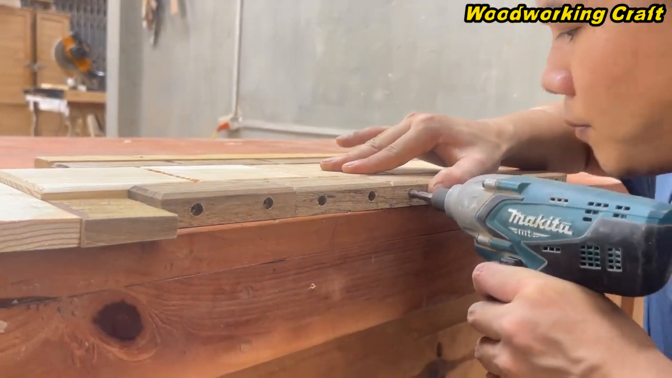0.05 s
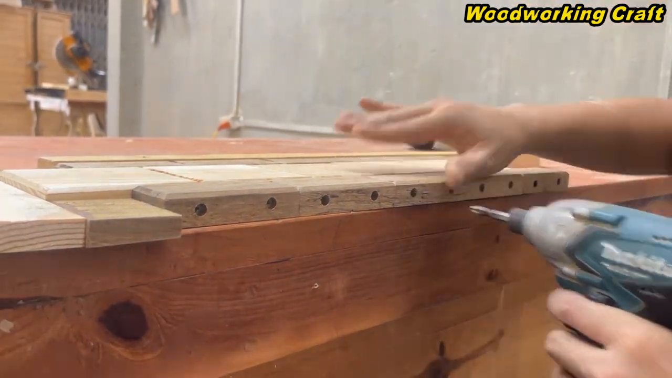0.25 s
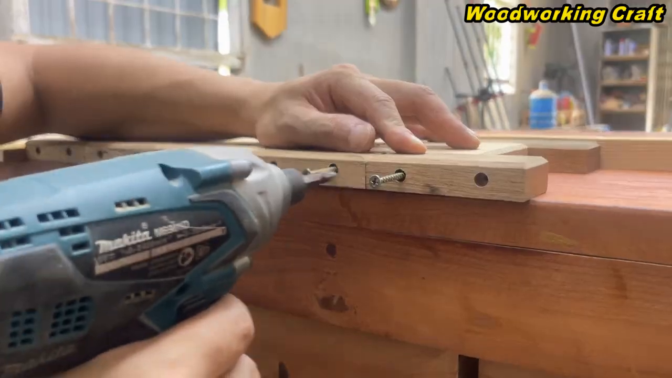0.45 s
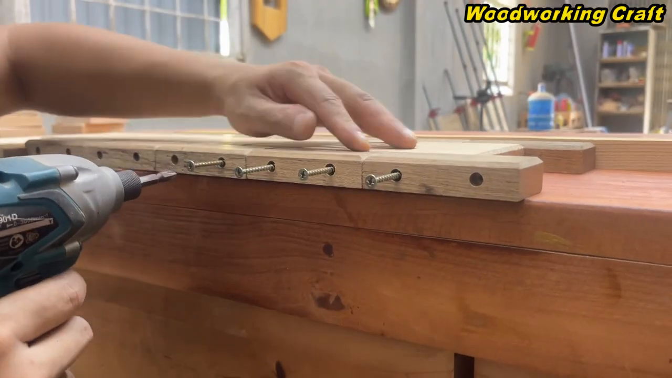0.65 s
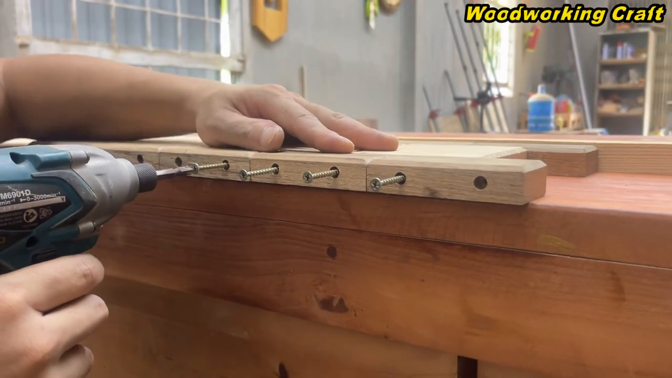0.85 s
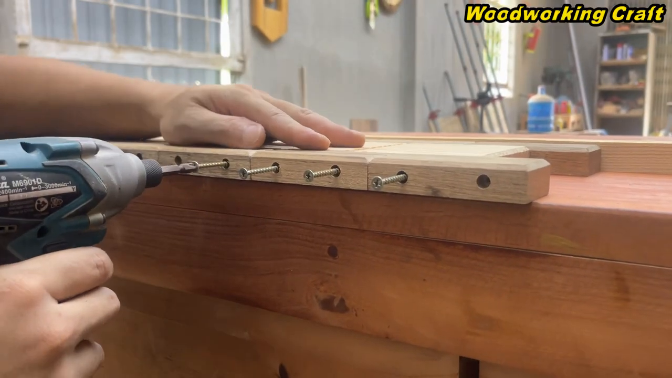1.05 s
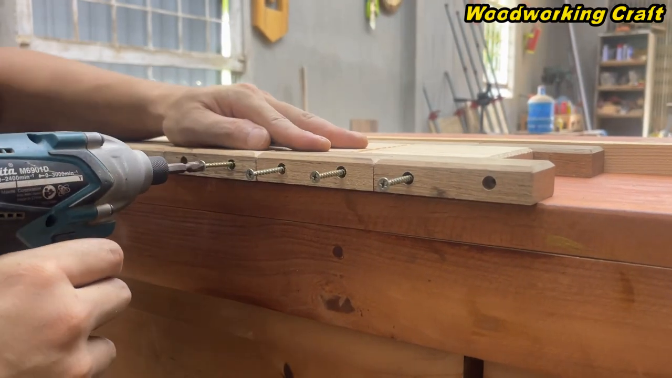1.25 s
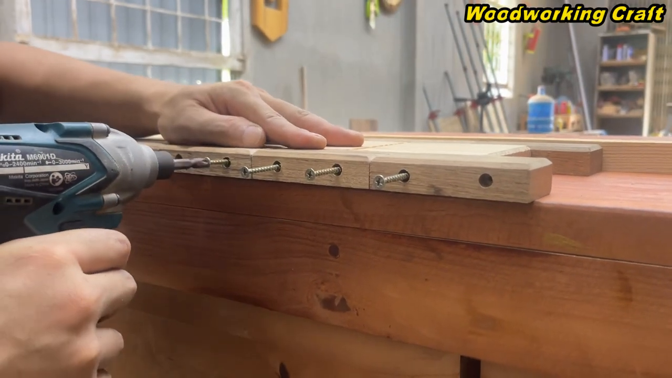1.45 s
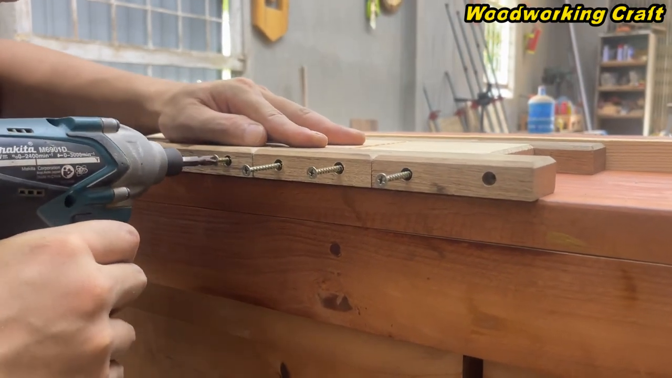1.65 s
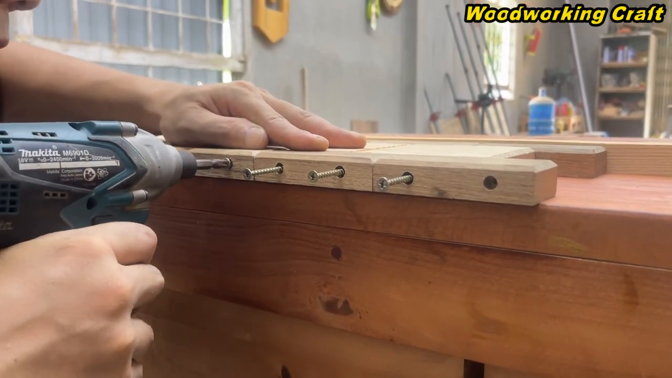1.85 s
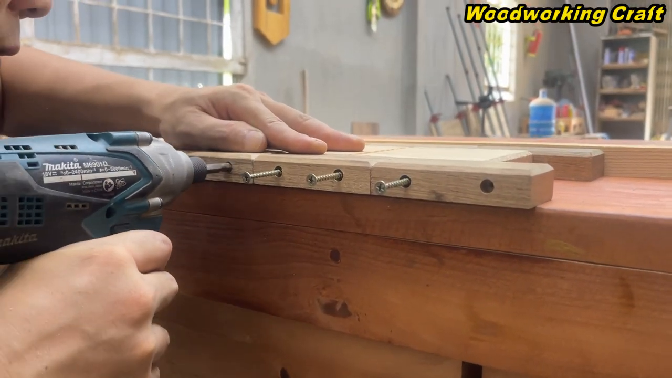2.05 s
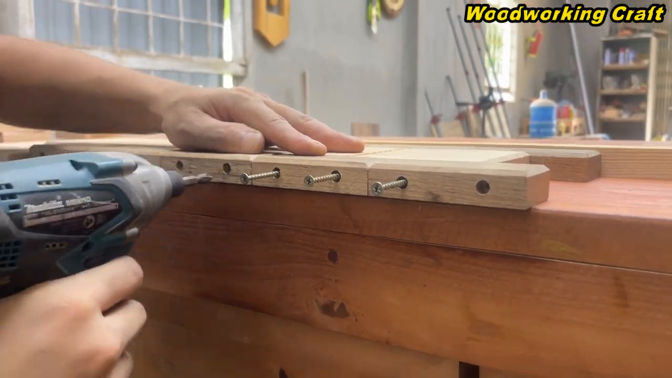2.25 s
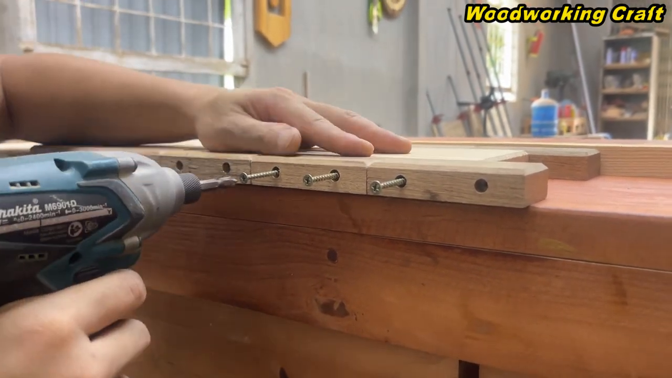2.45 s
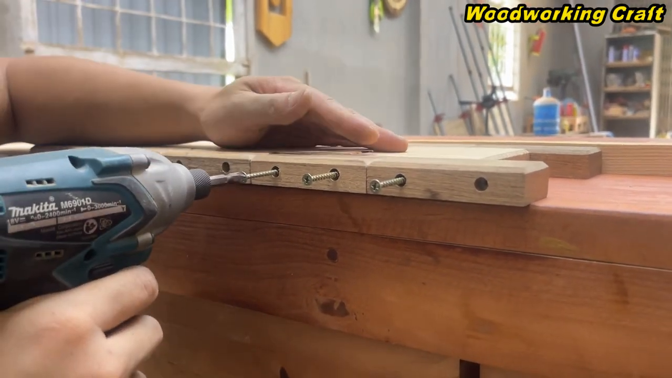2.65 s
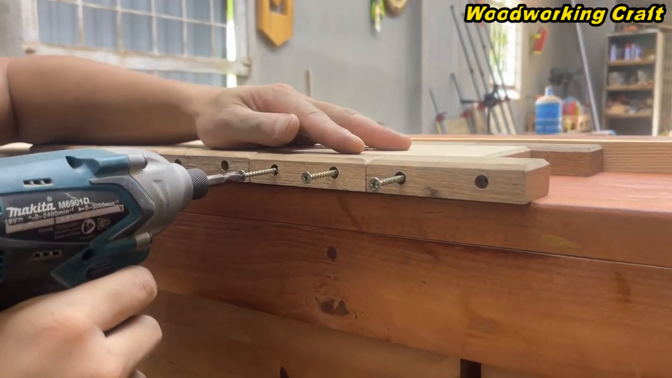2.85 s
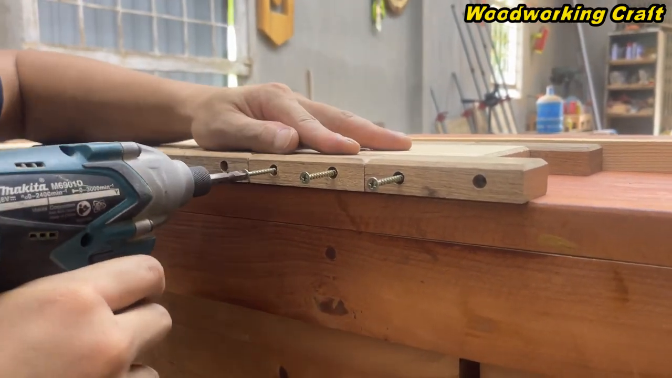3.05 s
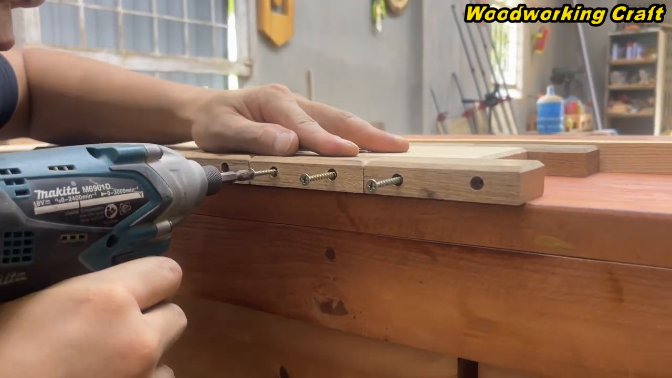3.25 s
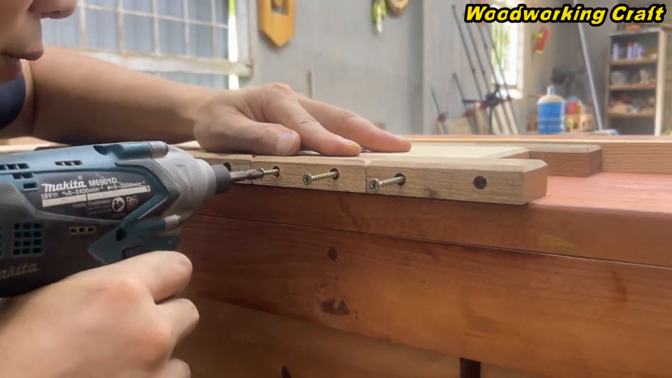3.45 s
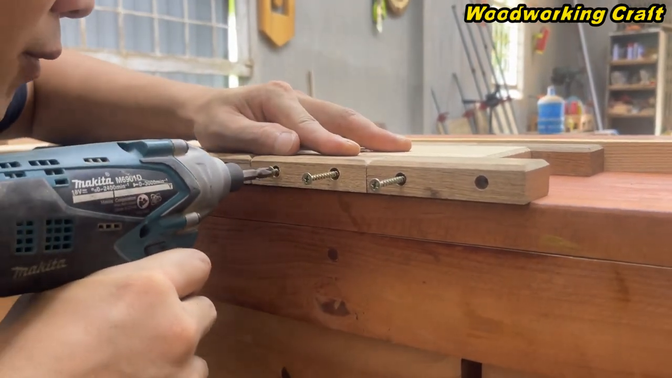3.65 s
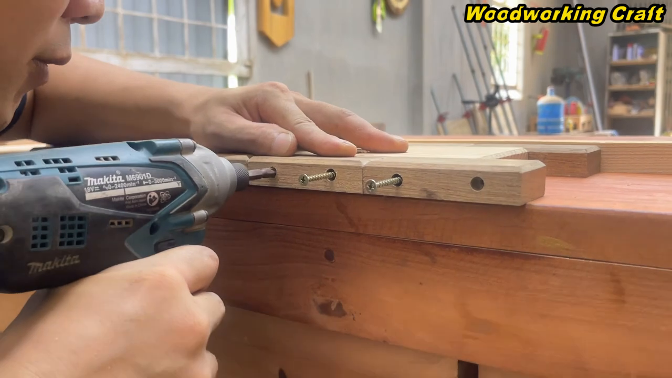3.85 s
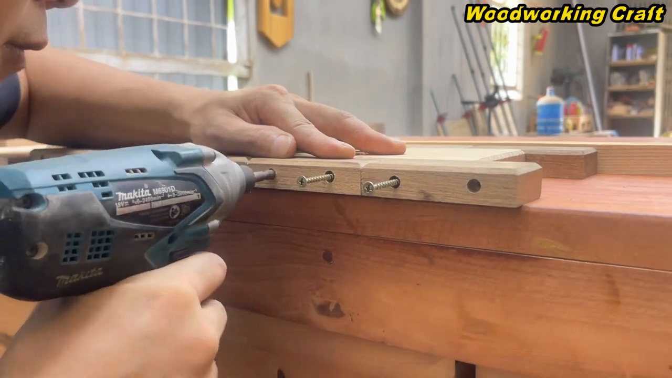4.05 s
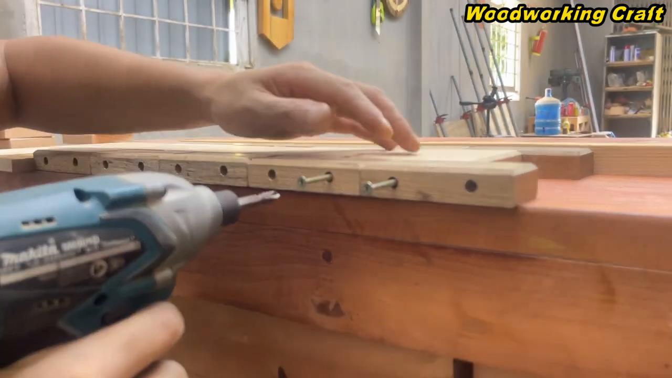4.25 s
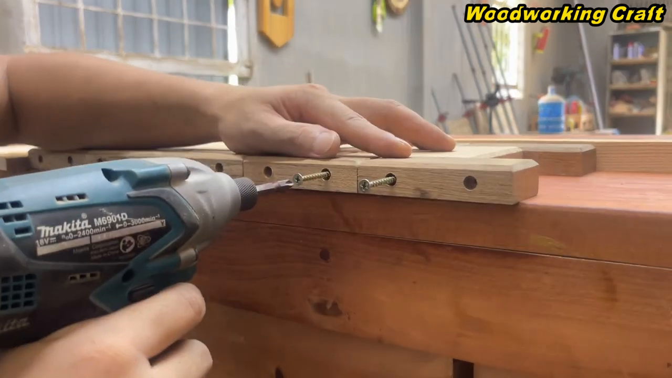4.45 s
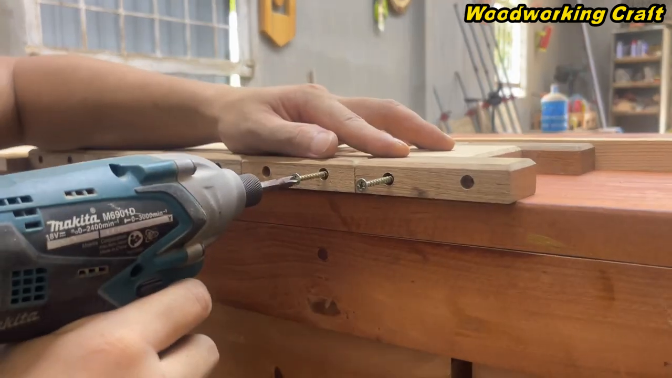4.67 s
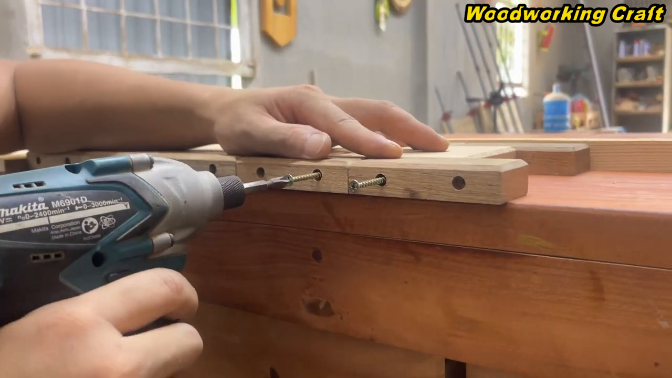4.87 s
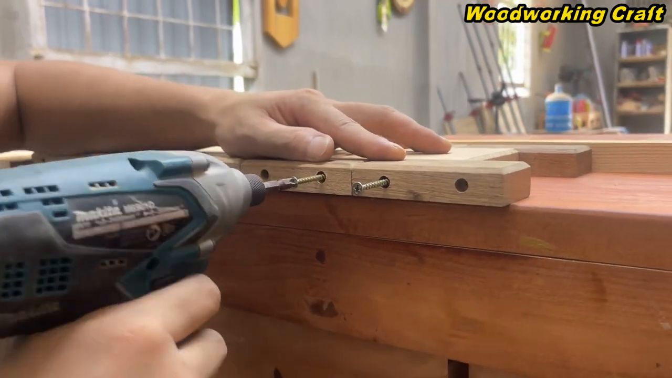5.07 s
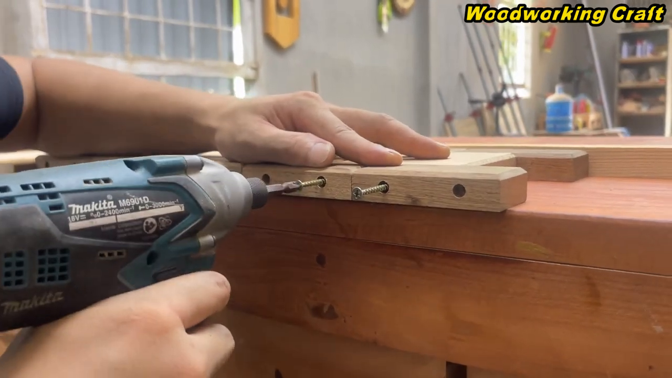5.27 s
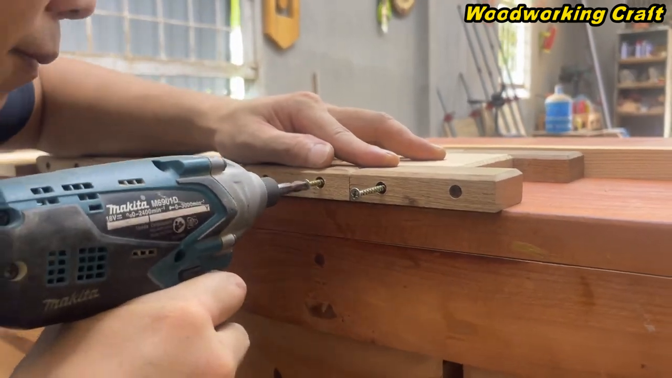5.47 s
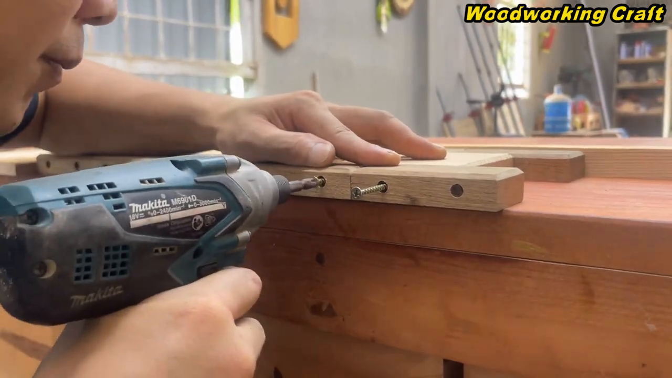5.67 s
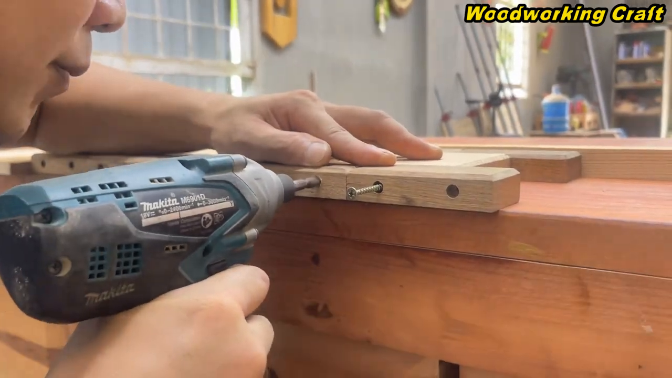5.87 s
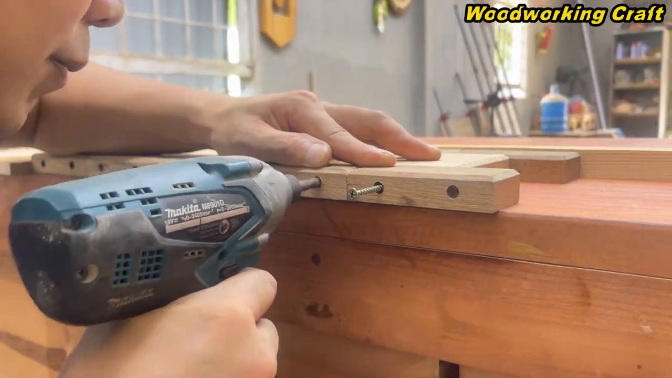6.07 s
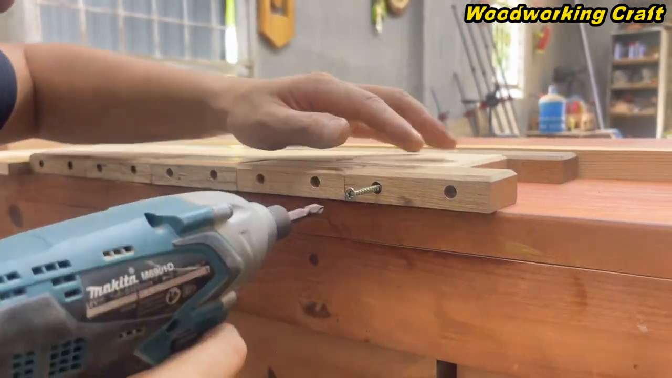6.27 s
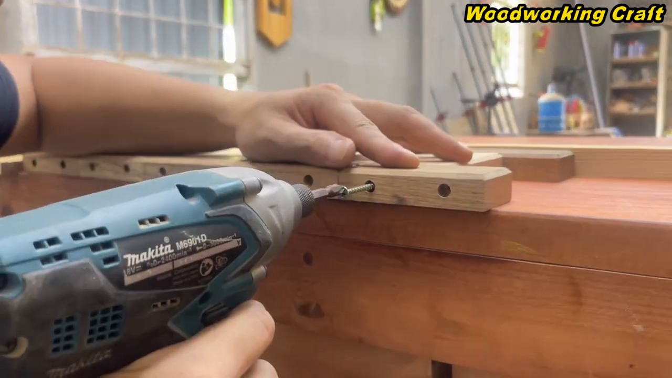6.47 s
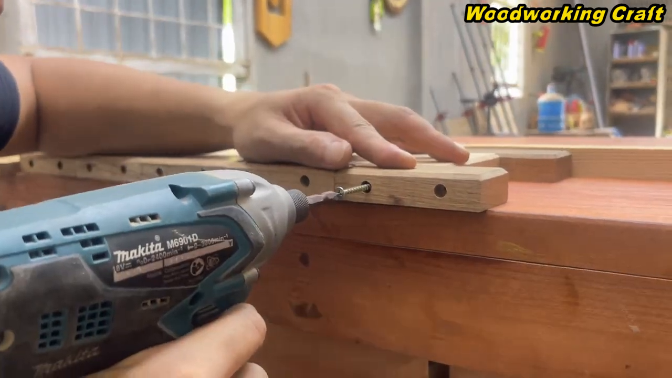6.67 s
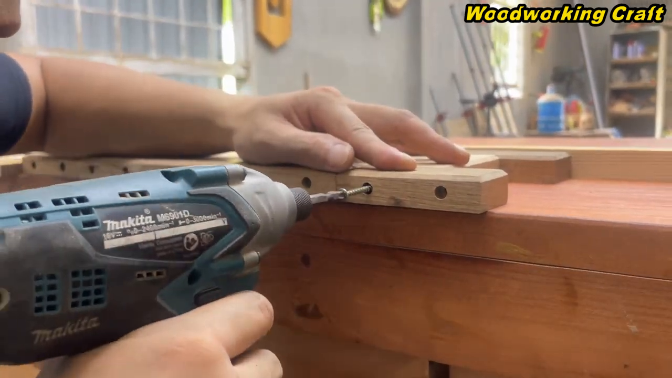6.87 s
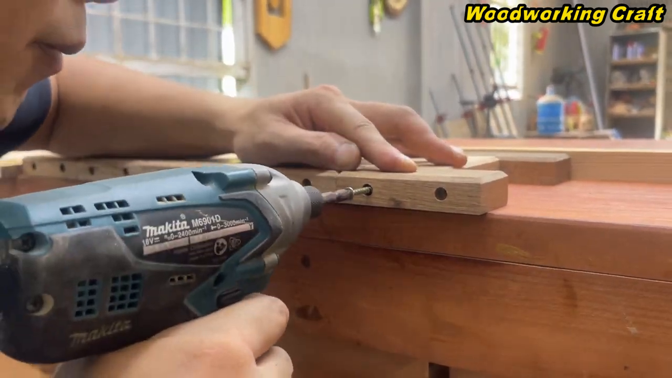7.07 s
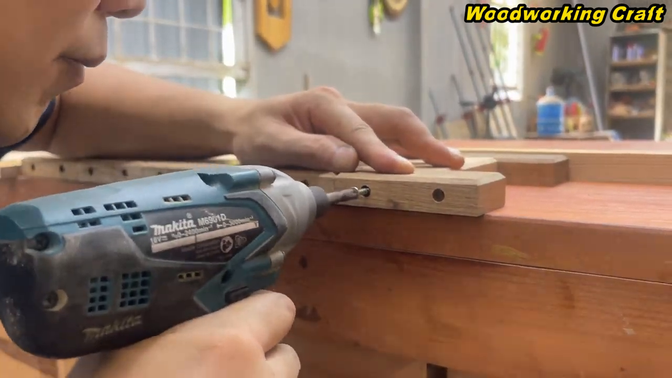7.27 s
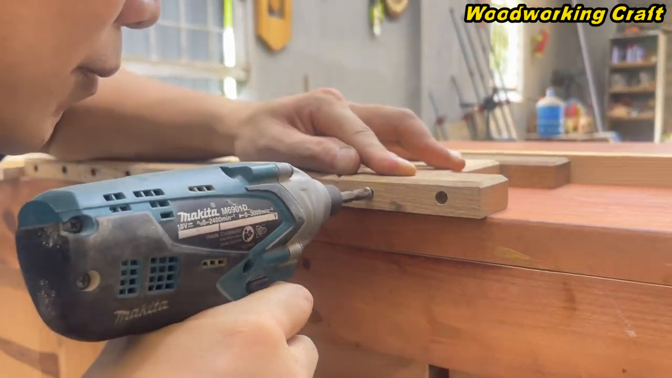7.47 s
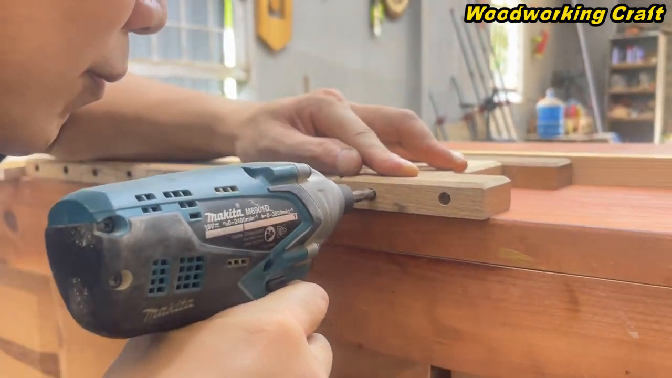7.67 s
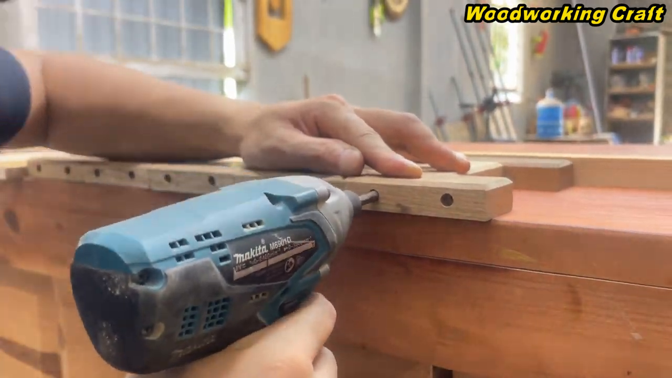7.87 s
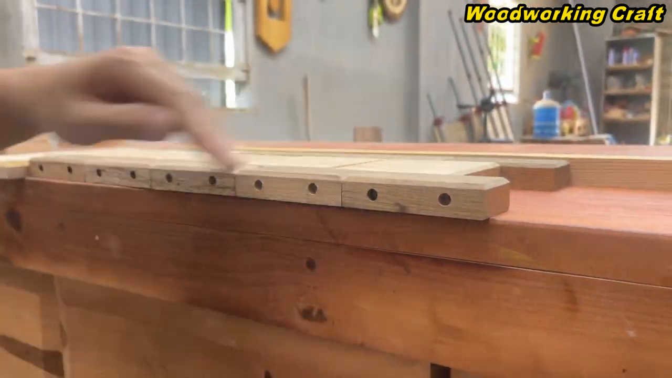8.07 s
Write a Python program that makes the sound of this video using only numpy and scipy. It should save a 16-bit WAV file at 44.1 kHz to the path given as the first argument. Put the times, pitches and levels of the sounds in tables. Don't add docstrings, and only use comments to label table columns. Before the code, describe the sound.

Rattling impact-driver bursts, bright and dry-edged, alternate with quiet gaps. A short tail of driving comes first, then four long bursts, the last preceded by a tiny false start. Each bites into wood with a woody resonance, hammers steadily, then swells as the head binds flush. In the gaps the bit knocks on screw heads, gears yelp briefly, and far machinery hums. Close small stereo microphone, short room reverberation.

```python
import sys
import numpy as np
from scipy import signal
from scipy.fft import rfft, irfft, next_fast_len
from scipy.io import wavfile
from scipy.ndimage import uniform_filter1d, map_coordinates

SR = 44100
rng = np.random.default_rng(int(sys.argv[2]) if len(sys.argv) > 2 else 0)


def to_wav(s):
    ch = np.atleast_2d(s).T
    pcm = np.round(np.clip(ch, -1, 1) * 32767)
    wavfile.write(sys.argv[1], SR, pcm.astype(np.int16))


def ratio_of_db(decibels):
    return 10 ** (np.asarray(decibels, float) / 20)


N = 358091


def sounding_rms(x):
    power = np.mean(np.atleast_2d(x) ** 2, axis=0)
    smooth = uniform_filter1d(power, size=2000)
    return np.sqrt(np.median(smooth[smooth > .1 * smooth.max()]))


def at_hz(points, size):
    hz = np.maximum(np.arange(size // 2 + 1) * SR / size, 1)
    table = np.array(points)
    return np.interp(np.log(hz), np.log(table[:, 0]), table[:, 1])


def colour(x, spectrum):
    size = next_fast_len(N)
    y = irfft(rfft(x, size) * ratio_of_db(at_hz(spectrum, size)), size)[..., :N]
    return y / sounding_rms(y)


def high_pass(x, hz):
    return signal.sosfilt(signal.butter(4, hz, "high", fs=SR, output="sos"), x)


# (frequency [Hz], likeness [0-1])
LIKENESS = [(60, 0.91), (300, 0.92), (900, 0.96), (1800, 0.51), (3000, 0.25), (8000, 0.66), (15000, 0.2)]
# (frequency [Hz], left leads by [rad])
PORT_LEAD = [(0, 0), (2070, 0.15), (3100, 8), (3960, 12), (6030, 10), (6890, 5), (8100, 18), (9040, 13.5),
             (10300, 19), (11800, 26), (12100, 20.5), (14000, 16), (15100, 23.5), (16300, 24)]


def stereo_noise():
    size = next_fast_len(N)
    left, other = rfft(rng.standard_normal((2, size)))
    alike = np.clip(at_hz(LIKENESS, size), 0, 1)
    lead = np.interp(np.arange(len(left)) * SR / size, *np.transpose(PORT_LEAD))
    right = alike * np.exp(-1j * lead) * left + np.sqrt(1 - alike ** 2) * other
    return irfft(np.array([left, right]), size)[:, :N]


def drift(rate):
    steps = rng.standard_normal(int(N / SR * rate) + 2)
    return map_coordinates(steps, [np.arange(N) / SR * rate], order=1)


def ring(clicks, hz, t60):
    r = ratio_of_db(-60 / (t60 * SR))
    w = 2 * np.pi * hz / SR
    return signal.lfilter([0, np.sin(w)], [1, -2 * r * np.cos(w), r * r], clicks + 1e-18)


def fade(clicks, t60):
    return signal.lfilter([1], [1, -ratio_of_db(-60 / (t60 * SR))], np.abs(clicks) + 1e-18)


def train(at_s, sizes):
    out = np.zeros(N)
    np.add.at(out, np.clip(np.round(at_s * SR).astype(int), 0, N - 1), sizes)
    return out


def hump(full_s, ends_s, db, rise, fall):
    t = np.arange(N) / SR
    return db + np.minimum(0, np.minimum(rise * (t - full_s), fall * (ends_s - t)))


def loudest(levels):
    return np.maximum(np.max(list(levels), axis=0), -140)


# (time [s], rumble level [dB])
MACHINES = [(0.3, -58), (0.6, -72.5), (0.9, -75), (1.1, -68.5), (1.4, -66), (2.4, -66.5), (2.8, -64.5),
            (3.3, -67.5), (4.3, -72.5), (4.7, -66), (5.3, -56.5), (6.3, -61), (6.7, -66), (7.1, -59.5),
            (8.1, -65.5)]
# (frequency [Hz], density [dB per Hz])
RUMBLE = [(35, -61), (60, -44), (107, -5), (189, -7), (237, -6.5), (268, -23.5), (306, 0), (423, -12.5),
          (471, -4), (651, -6), (678, -3.5), (755, -4), (1500, -22), (1950, -47), (3300, -120)]
# (loudest [s], level [dB], rise [dB/s], fall [dB/s])
STIRRING = [(0.35, -68, 24, 16), (1.05, -68, 20, 13), (2.75, -66, 20, 14.5), (5.25, -65.5, 15, 24),
            (7.151, -76.5, 58, 11)]
# (frequency [Hz], density [dB per Hz])
RUSTLE = [(700, -35.5), (1300, -0.5), (2000, -4.5), (3000, -7.5), (5500, -12), (9000, -24), (15000, -26)]
# (frequency [Hz], level [dB rms])
HUMS = [(232, -88), (301, -80), (463, -82.5), (748, -88.5), (870, -83)]
# (full [s], fades from [s], level [dB])
WHINES = [(0.42, 0.465, -63.5), (0.55, 0.637, -67), (0.92, 1.363, -61.5), (2.36, 2.45, -66.5),
          (4.3, 4.75, -68), (6.5, 6.88, -67), (7.0, 7.1, -66)]
# (full [s], fades from [s], level [dB], rise [dB/s], fall [dB/s])
SWELLS = [
    (5.3, 5.5, -61.5, 35, 39),
    (5.705, 5.88, -51, 80, 37),
    (6.62, 6.82, -65, 60, 40),
]
# (starts [s], ends [s])
PAUSE_S = (0.382, .4)


def shop():
    t = np.arange(N) / SR
    rumble_db = np.interp(t, *np.transpose(MACHINES))
    rumble = ratio_of_db(rumble_db + drift(6.9)) * colour(stereo_noise(), RUMBLE)

    stirring_db = loudest(hump(s, s, db, rise, fall) for s, db, rise, fall in STIRRING)
    rustle = ratio_of_db(np.maximum(-76, stirring_db) + drift(23)) * colour(stereo_noise(), RUSTLE)

    def tone(hz, wander=1.9, rate=13):
        return np.sqrt(2) * np.sin(2 * np.pi * hz * t + wander * drift(rate))

    busy_db = rumble_db - rumble_db.mean()
    hums = sum(ratio_of_db(db + 2.5 + busy_db + 3.0 * drift(7.1)) * tone(hz) for hz, db in HUMS)
    swell_db = loudest(hump(*row, rise=80, fall=80) for row in WHINES)
    whine_db = np.maximum(-71.5, swell_db) + 2.5 * drift(15)
    hums = hums + ratio_of_db(whine_db + drift(30)) * tone(638)

    low_db = loudest(hump(*row) for row in SWELLS) + 2.5 * drift(9)
    low_hum = ratio_of_db(low_db) * tone(112.6, wander=.7, rate=10)
    return rumble + rustle + hums * (t > PAUSE_S[1]) + low_hum


# (frequency [Hz], decay time t60 [s])
REVERB = [(200, 0.52), (530, 0.28), (1390, 0.35), (3680, 0.3), (9700, 0.19)]


def room(x):
    t = np.arange(SR // 2) / SR
    _, frames, cells = signal.stft(stereo_noise()[:, :len(t)], SR, nperseg=256)
    cells = cells * ratio_of_db(-60 * frames / at_hz(REVERB, size=256)[:, None])
    tail = signal.istft(cells, SR, nperseg=256)[1][:, :len(t)]
    tail = tail * np.clip(t / 0.0015, 0, 1)
    return signal.fftconvolve(x, tail / np.sqrt(np.sum(tail ** 2) / 2), axes=1)[:, :N]


# (full [s], ends [s], level [dB], fall [dB/s])
RUBBING = [
    (2.61, 2.66, -54, 59),
    (2.873, 2.89, -55, 131),
    (6.58, 6.606, -56.5, 199.5),
]
# (frequency [Hz], density [dB per Hz])
SCUFF = [(350, -31.5), (650, -4), (1000, 0.5), (1700, -8), (2400, -18.5), (4000, -24), (9000, -35)]


def rubbing():
    rub_db = loudest(hump(a, b, db, 400, fall) for a, b, db, fall in RUBBING)
    return ratio_of_db(rub_db - 5.5 + 3 * drift(77)) * colour(stereo_noise(), SCUFF)


# (frequency [Hz], bandwidth [Hz], level [dB])
HOUSING = [(1262, 21, -9), (1418, 76, -9), (1591, 100, -1.5), (1793, 36, -10.5), (2015, 73, -11.5),
           (2397, 79, -9), (3290, 220, -5.5), (5350, 370, -4), (6340, 990, -8)]


def housing(clicks):
    rings = 0
    for k, (hz, width, db) in enumerate(HOUSING):
        t60 = np.log(1000) / np.pi / width
        rings = rings + (-1) ** k * ratio_of_db(db) * np.sqrt(width) * ring(clicks, hz, t60)
    return high_pass(rings, hz=766)


# (frequency [Hz], level [dB], decay time t60 [s])
BOARD = [(336, -6, 0.18), (366.2, -9, 0.22), (443.6, -5, 0.38), (486.7, 1.5, 0.24), (544.3, -3.5, 0.63),
         (601.5, 0, 0.29), (676.7, 2, 0.2), (775, 1, 0.13), (860, -3, 0.17), (943, 2.5, 0.12),
         (1030.6, 4, 0.12)]


def wood(at, sizes, spread_db, ring_share):
    odds = rng.standard_normal((len(at), len(BOARD)))
    rings = 0
    for k, (hz, db, t60) in enumerate(BOARD):
        clicks = train(at, sizes * ratio_of_db(db + spread_db * odds[:, k]))
        rings = rings + (-1) ** k * ring(clicks, hz, ring_share * t60)
    return high_pass(rings, hz=312)


# (time [s], peak [dB], knock [Hz], shell over knock [dB], tick over knock [dB])
TAPS = [(0.4, -51, 638, -17, -22), (0.559, -65, 630, 3, 0), (0.891, -47.5, 473, -2.5, -3),
        (0.91, -41.5, 596, -34, -19), (1.008, -47.5, 605, -8.5, -14.5), (1.049, -43, 463, -11.5, -32),
        (1.183, -45.5, 657, -8, -4.5), (1.224, -59, 638, 9, 1), (2.604, -45, 652, -15, -25),
        (3.021, -53, 620, -9.5, -6), (3.113, -44, 490, -14, -32), (4.262, -51.5, 537, -8.5, -15.5),
        (4.547, -48, 783, -4.5, -37), (5.092, -44, 600, -10.5, -43), (6.401, -62.5, 638, -17, -30),
        (6.504, -48, 627, -4, -21), (6.59, -69, 640, 8, -29), (6.816, -42, 634, -9, -26),
        (6.85, -35.5, 648, -17, -25)]
# (frequency [Hz], density [dB per Hz])
TICK = [(1500, -33), (3500, 2), (6500, -1.5), (11000, -8.5), (15500, -6)]


def taps():
    at, peak_db, knock_hz, shell_db, tick_db = np.transpose(TAPS)
    knock = sum(ring(train(at[k:k + 1], ratio_of_db(peak_db[k] - 4.5)), knock_hz[k], .12) for k in range(len(at)))
    knock = knock + wood(at, ratio_of_db(peak_db - 19.0), spread_db=-5.5, ring_share=0.57)
    touch = train(at, ratio_of_db(peak_db + shell_db))
    rattle = 0.2 * fade(touch, .06) * rng.standard_normal(N)
    shell = ratio_of_db(-28.0) * housing(touch + rattle)
    tick = fade(train(at, ratio_of_db(peak_db + tick_db + 3.5)), 0.028) * colour(stereo_noise(), TICK)
    scuff = ratio_of_db(-5.5) * fade(touch, 0.16) * colour(stereo_noise(), SCUFF)
    soft = signal.butter(2, 2600, fs=SR, output="sos")
    return high_pass(signal.sosfilt(soft, knock + shell) + scuff + tick, hz=249)


# (time [s], length [s], first frequency [Hz], last frequency [Hz], level [dB])
YELPS = [(1.313, 0.064, 1170, 1740, -65), (1.42, 0.024, 1360, 1960, -56), (3.19, 0.027, 1312, 1824, -58),
         (5.265, 0.04, 1667, 2370, -50), (7.006, .055, 1550, 2500, -52), (7.127, 0.05, 1540, 2500, -49)]


def yelps():
    out, t = np.zeros(N), np.arange(N) / SR
    rough = .4 + drift(300)
    for start, length, first_hz, last_hz, db in YELPS:
        part = np.clip((t - start) / length, 0, 1)
        glide = np.sin(2 * np.pi * np.cumsum(first_hz + (last_hz - first_hz) * part) / SR)
        note = np.sin(2 * np.pi * 1.1 * first_hz * t)
        out += ratio_of_db(db) * np.sin(np.pi * part) * rough * (.6 * glide + note)
    return out


# (frequency [Hz], density [dB per Hz])
WHIR = [(500, -22), (900, -7), (1260, -7), (1770, -4.5), (2100, -10), (2420, -7.5), (2900, -11.5),
        (5300, -16.5), (8200, -18.5), (11600, -18), (15800, -22)]


def motor(whir_db):
    hiss = ratio_of_db([[1.5], [0]]) * colour(stereo_noise(), WHIR)
    teeth = housing(rng.standard_normal(N) * (rng.random(N) < 600 / SR))
    teeth = teeth / sounding_rms(teeth)
    level = ratio_of_db(whir_db - 3.5 + 1.4 * drift(40))
    return level * (ratio_of_db(2.4 * drift(350)) * hiss + ratio_of_db(-6.5) * teeth)


# (full [s], ends [s], level [dB])
BOOM = [
    (1.522, 1.582, -24.5),
    (3.424, 3.43, -24.5),
    (7.284, 7.327, -32.5),
]
# (frequency [Hz], decay time t60 [s])
BOOM_NOTE = (606, 0.19)


def boom(at):
    boom_db = loudest(hump(*row, rise=274, fall=258.5) for row in BOOM)
    in_step = np.round(at * BOOM_NOTE[0]) / BOOM_NOTE[0]
    return ring(train(in_step, ratio_of_db(boom_db[(at * SR).astype(int)] - 9.5)), *BOOM_NOTE)


# (frequency [Hz], decay time t60 [s])
THUD = (170, .035)


def board(at, board_db, binding):
    share = np.clip(binding, 0, 1)

    def now(curve, s):
        return curve[(s * SR).astype(int)]

    sizes = ratio_of_db(now(board_db, at)) * np.sqrt(1 - now(share, at))
    struck = wood(at + .0015, sizes, spread_db=1, ring_share=.3)
    struck = signal.lfilter([.12], [1, -.88], struck)
    slips = np.sort(rng.uniform(0, N / SR, 4000))
    jerks = rng.standard_normal(len(slips)) * ratio_of_db(now(board_db, slips)) * np.sqrt(now(share, slips))
    creak = wood(slips, jerks, spread_db=2.5, ring_share=0.68)
    creak = signal.lfilter([.08], [1, -.92], creak)
    thud = high_pass(ring(train(slips, jerks), *THUD), hz=109)
    return ratio_of_db(-4.0) * struck + ratio_of_db(-10.0) * creak + ratio_of_db(-17) * thud


# (starts [s], eases [s], anvil crack [dB], board [dB], motor [dB])
DRIVES = [
    (0.001, 0.11, -37, -37.5, -30),
    (1.463, 2.17, -37, -35, -37.5),
    (3.359, 4.03, -36.5, -37.5, -37),
    (5.392, 6.09, -37.5, -36, -36.5),
    (7.177, 7.221, -45, -30, -32),
    (7.258, 7.76, -37, -38.5, -36),
]
# (starts [s], ends [s], board [dB], motor [dB])
BITES = [
    (1.465, 1.607, -27, -29.5),
    (3.345, 3.457, -32.5, -33.5),
    (5.396, 5.44, -34.5, -33.5),
    (7.254, 7.367, -33, -32.5),
]
# (flush [s], trigger let go [s], board [dB], motor [dB], build-up [dB/s])
SEATS = [
    (0.114, 0.136, -23.5, -29, 161),
    (2.163, 2.211, -27, -31.5, 90),
    (4.035, 4.097, -26, -33.5, 899),
    (6.065, 6.13, -25, -30, 392.5),
    (7.798, 7.848, -25, -31.5, 123),
]
# (full speed [s], let go [s], whir level [dB])
SQUEEZES = [(1.187, 1.208, -59.5), (1.326, 1.342, -44), (1.43, 1.474, -41.5), (3.036, 3.075, -57.5),
            (3.186, 3.218, -50.5), (3.33, 3.35, -43), (5.271, 5.3, -49.5), (5.386, 5.39, -40.5),
            (6.862, 6.872, -50.5), (7.018, 7.046, -47), (7.134, 7.175, -45.5)]


def effort():
    strike = 2499
    crack_db = loudest(hump(a, b, db, strike, 196) for a, b, db, _, _ in DRIVES)
    run = [hump(a, b, 0, strike, 598) for a, b, *_ in DRIVES]
    bite = [hump(a, b, 0, strike, 201) for a, b, *_ in BITES]
    seat = []
    for flush, let_go, _, _, rise in SEATS:
        burst_s = max(row[0] for row in DRIVES if row[0] < flush)
        running = np.arange(N) > SR * burst_s
        seat.append(np.where(running, hump(flush, let_go, 0, rise, 420), -140))
    shapes = run + bite + seat
    pairs = [row[3:5] for row in DRIVES] + [row[2:4] for row in BITES] + [row[2:4] for row in SEATS]
    board_dbs, motor_dbs = np.transpose(pairs)
    squeezes = [hump(*row, rise=695, fall=403) for row in SQUEEZES]
    board_db = loudest(s + db for s, db in zip(shapes, board_dbs))
    whir_db = loudest([s + db for s, db in zip(shapes, motor_dbs)] + squeezes)
    binding = 0.067 + 0.28 * ratio_of_db(loudest(seat))
    return crack_db, board_db, binding, whir_db


# (time [s], blows struck so far [count])
BLOWS = [
    [(0.0086, 0), (0.1104, 11), (0.1217, 12)],
    [(1.473, 0), (1.6007, 11), (1.8118, 31), (1.9309, 42), (2.0812, 57), (2.1803, 68), (2.2002, 70),
     (2.2319, 72)],
    [(3.3506, 0), (3.4339, 7), (3.5322, 16), (3.7823, 40), (3.8848, 50), (4.0411, 66), (4.0645, 68),
     (4.0974, 69)],
    [(5.3955, 0), (5.5037, 10), (5.6078, 20), (5.7608, 35), (6.0209, 61), (6.0777, 67), (6.1118, 70),
     (6.1384, 72)],
    [(7.1818, 0), (7.2234, 3)],
    [(7.2541, 0), (7.2904, 3), (7.3345, 7), (7.45, 18), (7.5941, 32), (7.733, 46), (7.7889, 52),
     (7.8283, 56)],
]


def blow_times():
    runs = []
    for burst in BLOWS:
        times, counts = np.transpose(burst)
        run = np.interp(np.arange(burst[-1][1] + 1), counts, times)
        smooth = signal.filtfilt(np.ones(5) / 5, 1, run[:-2], padlen=min(12, len(run) - 3))
        runs.append(np.r_[smooth, run[-2:]])
    return np.concatenate(runs)


# (frequency [Hz], level [dB], decay time t60 [s])
ANVIL = [(3380, -16, 0.0023), (6100, -8.5, 0.0032), (9690, -18.5, 0.0022), (11730, -3, 0.003),
         (12570, 1, .002), (13840, 1.5, 0.0025), (14820, -3, 0.0012), (15400, 3, 0.0014)]
# (frequency [Hz], density [dB per Hz])
CLATTER = [(700, -35.5), (1500, -15), (3300, 7.5), (5500, 1.5), (8500, 2.5), (11500, 1.5), (15800, -13.5)]


def hammer(at, crack_db):
    loose = at + .0002 * rng.standard_normal(len(at))
    crack_size, tick_size, echo_size = ratio_of_db(3.0 * rng.standard_normal((3, len(at))))
    crack = 0
    for hz, db, t60 in ANVIL:
        late, uneven = rng.standard_normal((2, len(at)))
        main = train(loose - .0001 + .00008 * late, crack_size * ratio_of_db(db + 2.5 * uneven))
        first_tick = train(loose - .0007, tick_size * ratio_of_db(db - 12.5))
        crack = crack + ring(main + first_tick, hz, t60)
    crack = high_pass(crack, hz=2500)
    crack = np.array([ratio_of_db(2.5) * crack, ratio_of_db(-6.0) * np.roll(crack, shift=11)]) / sounding_rms(crack)
    bounce = train(loose, crack_size) + ratio_of_db(-12) * train(loose + 0.0024, echo_size)
    clatter = colour(fade(bounce, 0.014) * stereo_noise(), CLATTER)
    shell = housing(train(at, crack_size ** 0.34))
    shell = np.array([ratio_of_db(-2.0) * shell, np.roll(shell, shift=3)]) / sounding_rms(shell)
    return ratio_of_db(crack_db) * (ratio_of_db(1.5) * crack + ratio_of_db(-2) * clatter + ratio_of_db(-5) * shell)


def scene():
    crack_db, board_db, binding, whir_db = effort()
    at = blow_times()
    work = hammer(at, crack_db) + board(at, board_db, binding) + motor(whir_db)
    work = work + boom(at) + yelps() + taps()
    return work + ratio_of_db(-6.5) * room(high_pass(work, hz=212)) + rubbing() + shop()


def band_limit(x):
    return signal.sosfilt(signal.butter(12, 16740, fs=SR, output="sos"), x)


def record(dry):
    t = np.arange(N) / SR
    outside_s = np.maximum(PAUSE_S[0] - t, t - PAUSE_S[1])
    live = np.clip(outside_s / 0.0016, .05, 1)
    x = signal.sosfilt(signal.butter(2, 70, "high", fs=SR, output="sos"), dry * live)
    x = .34 * np.tanh(x / .34)
    x = signal.sosfilt(signal.ellip(10, .5, 60, 15900, fs=SR, output="sos"), x)
    return band_limit(x)


dry = scene()
out = record(dry)
to_wav(out)
```